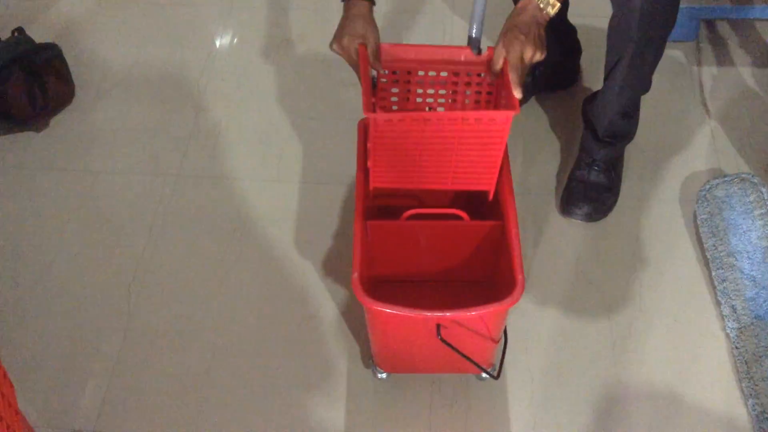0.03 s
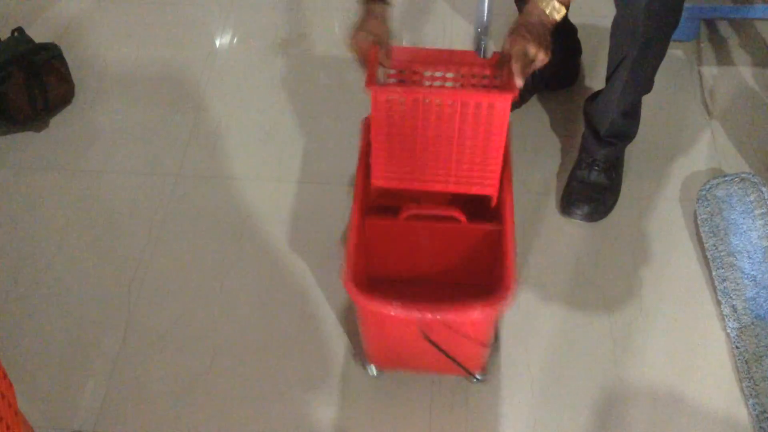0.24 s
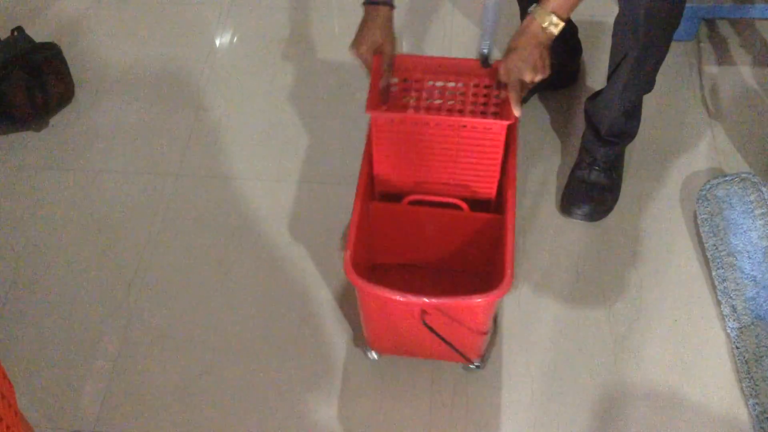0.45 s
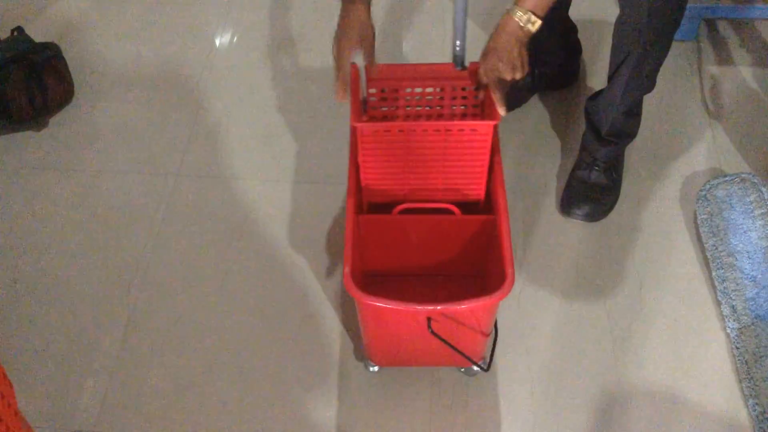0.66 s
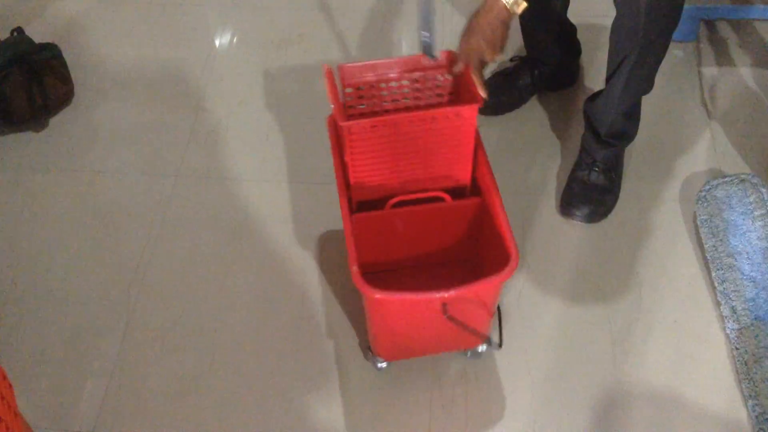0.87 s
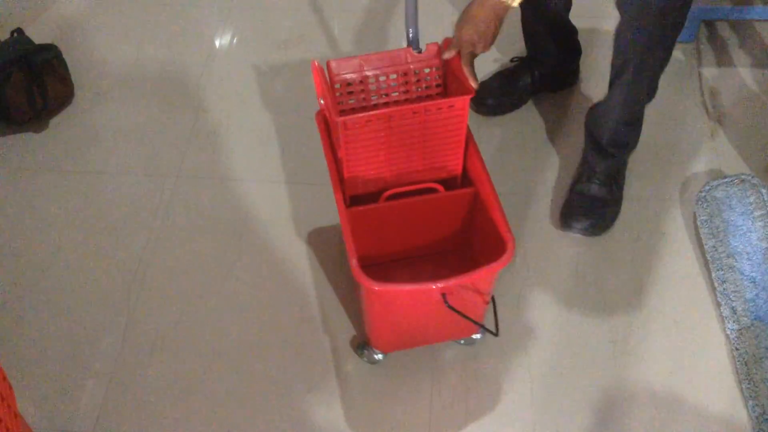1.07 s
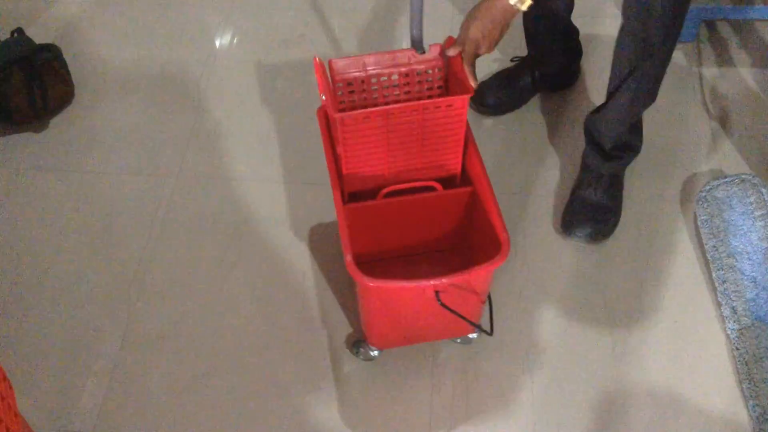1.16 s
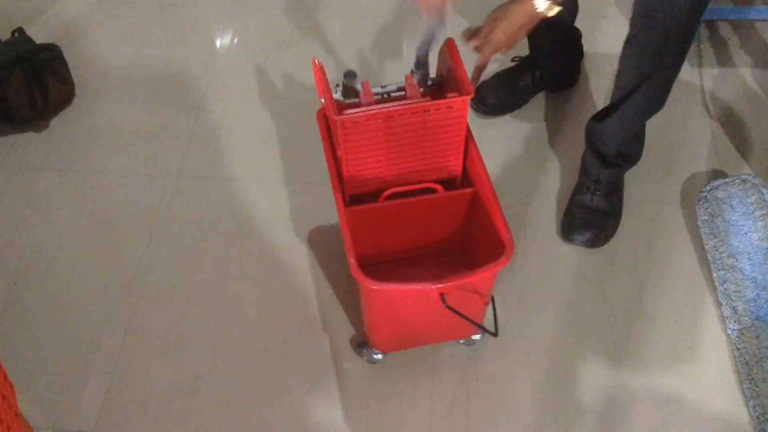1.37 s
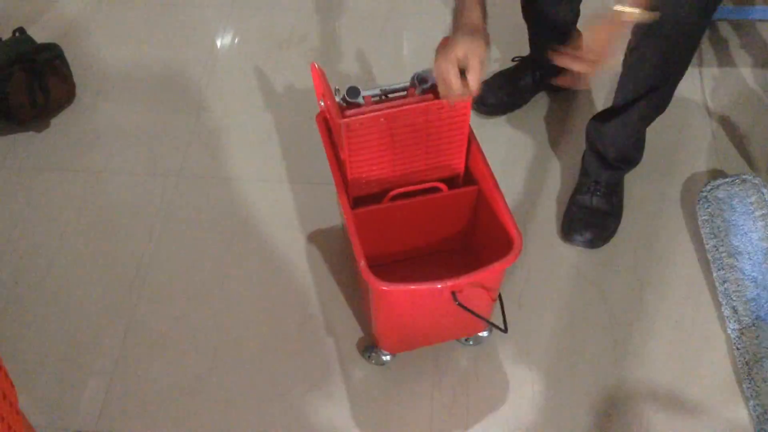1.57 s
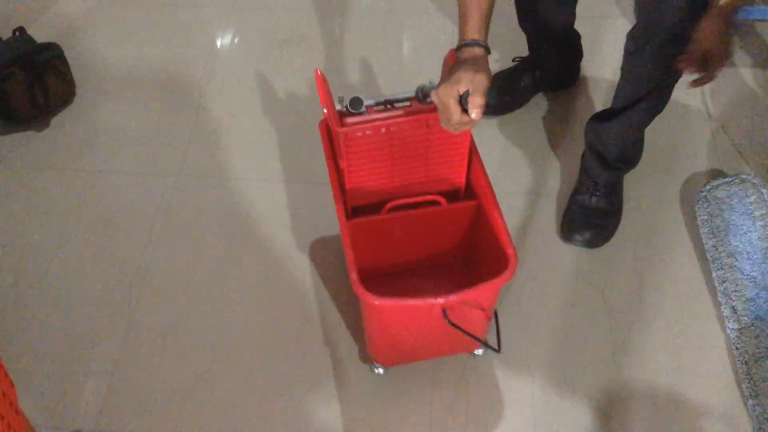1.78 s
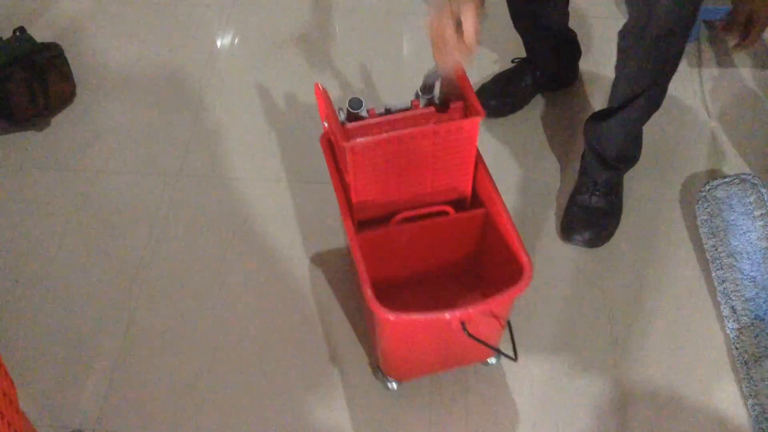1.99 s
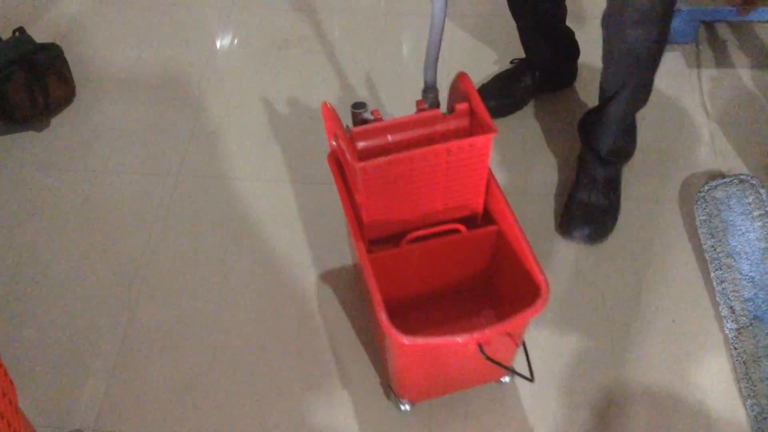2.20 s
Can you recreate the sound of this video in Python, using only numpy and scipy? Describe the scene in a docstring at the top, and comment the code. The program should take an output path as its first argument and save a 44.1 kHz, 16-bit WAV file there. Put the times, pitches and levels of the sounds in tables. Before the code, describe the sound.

A plastic wringer clatters onto a mop bucket, with loud, hollow knocks and sharp cracks from about 0.2 to 0.6 seconds. From 0.9 seconds the parts rub and rattle quietly as the metal lever swings over. It snaps over its catch near 1.5 seconds, firmer knocks follow around 1.7, and light ones come near 2 seconds. The sound is close, with a short tiled-room echo and faint air noise.

```python
"""A mop bucket in a tiled room, on one microphone close by, over faint air noise.
First a plastic wringer drops onto the bucket and clatters into its seat: each knock booms in the tub
and the wringer box, clacks in the thin walls and cracks at the hard edges. From about 0.9 s the parts
rub and rattle as the metal lever is swung over. Near 1.5 s it snaps over its catch; a few firmer
knocks follow, then some light last ones, and the room rings out."""
import sys
import numpy as np
from scipy import signal
from scipy.fft import rfft, irfft
from scipy.io import wavfile

SR = 44100
rng = np.random.default_rng(int(sys.argv[2]) if len(sys.argv) > 2 else 0)


def store_wav(level_fs):
    """Save 16-bit WAV to argv[1]."""
    pcm = np.round(np.clip(np.atleast_2d(level_fs), -1, 1) * 32767)
    wavfile.write(sys.argv[1], SR, pcm.T.astype(np.int16))


N = 99225
LONG_T, SHORT_T = np.arange(SR // 3) / SR, np.arange(SR // 10) / SR  # t/s within one sound


def undb(db):
    """Decibels to gain."""
    return 10 ** (np.asarray(db) / 20)


def unit(x):
    """Scale to rms 1."""
    return x / np.sqrt(np.mean(x ** 2))


def add(out, s, sound):
    """Mix a sound in at s seconds."""
    start = int(s * SR)
    out[start:start + len(sound)] += sound[:N - start]


def at(hz, points):
    """Read (f/Hz, value) points on a log-frequency axis."""
    freqs, values = np.array(points).T
    return np.interp(np.log(np.maximum(hz, 1)), np.log(freqs), values)


def colour(x, points):
    """Causal filter with the given spectrum; white noise keeps its power."""
    size = 4096
    gain = unit(undb(at(np.fft.rfftfreq(size, 1 / SR), points)))
    cepstrum = irfft(np.log(gain))[:size // 2]
    cepstrum[1:] *= 2  # minimum phase
    response = irfft(np.exp(rfft(cepstrum, size)))[:size // 2]
    return signal.fftconvolve(x, response)[:len(x)]


def clicks(count, per_s):
    """Impulses of random time and strength, over count samples."""
    return (rng.random(count) < per_s / SR) * rng.standard_normal(count)


def modes(hz, table, scatter_db=1):
    """Decaying sines; each blow lands elsewhere and weights them anew."""
    db, t60 = np.array(table).T[:, :, None]
    weight, phase = rng.standard_normal((2, len(table), 1))
    gain = undb(db + scatter_db * weight)
    gain = gain / np.sqrt(np.sum(gain ** 2) / 2)
    sines = np.sin(2 * np.pi * (np.outer(hz, LONG_T) + phase))
    return np.sum(gain * undb(-60 * LONG_T / t60) * sines, axis=0)


def burst(spectrum, contact_s, t60, rise_s=0.00024, touches_per_s=4000):
    """Many close, well-damped modes: they build while the parts chatter in contact, then die away."""
    build = 1 - np.exp(-SHORT_T / (rise_s + 0.21 * contact_s))
    envelope = build * undb(-60 * np.maximum(SHORT_T - contact_s, 0) / t60)
    touches = rng.random(len(SHORT_T)) < touches_per_s / SR
    drive = (1.3 + unit(touches * 1.)) * rng.standard_normal(len(SHORT_T))
    return unit(colour(envelope * drive, spectrum)) * np.sqrt(np.mean(envelope ** 2))


# Room tone at the microphone: f/Hz, relative level/dB
AIR_SPECTRUM = [(25, -30), (80, -11), (150, 4), (300, 2), (600, -7.5), (1500, -11), (3500, -6),
                (7500, -19.5), (15000, -18)]
def room_tone():
    """Still air and a faint, steady hiss."""
    return undb(-57) * unit(colour(rng.standard_normal(N), AIR_SPECTRUM))


# Ring time of the tiled room: f/Hz, T60/s
REVERB_T60 = [(150, 0.31), (400, 0.34), (1000, .5), (2800, .5), (4500, 0.3651), (7000, 0.25), (14000, 0.26)]
# Strength of its reverberation at the microphone: f/Hz, level/dB
REVERB_SPECTRUM = [(60, -9), (160, -9.5), (300, -9), (1000, -5.5), (3500, -6), (7000, -3.5), (14000, -2)]
def reverberation(x, build_s=0.002):
    """Dense reflections from the tiles and walls farther off; the treble dies first."""
    t, hz = np.arange(SR) / SR, np.fft.rfftfreq(SR, 1 / SR)
    noise, response = rfft(rng.standard_normal(SR)), 0
    centres = np.geomspace(60, 16000, 12)
    for centre, share in zip(centres, np.eye(len(centres))):
        envelope = (1 - np.exp(-t / build_s)) * undb(-60 * t / at(centre, REVERB_T60))
        band = irfft(noise * np.interp(hz, centres, share), SR)
        response += band * envelope / np.linalg.norm(envelope) * undb(at(centre, REVERB_SPECTRUM))
    return signal.fftconvolve(x, response)[:N]


def early_echoes(x, gap_s=0.002, t60=0.22):
    """A short spray of distinct echoes off the nearest tiles and the inside of the tub."""
    taps = clicks(len(LONG_T), per_s=900) * (LONG_T > gap_s) * undb(-60 * LONG_T / t60)
    taps = signal.sosfilt(signal.butter(2, 500, "high", fs=SR, output="sos"), taps)
    return undb(-8.5) * signal.fftconvolve(x, taps / np.linalg.norm(taps))[:N]


# Bumps down at the floor: t/s, level/dB
FLOOR_BUMPS = [(.342, -53), (.408, -40), (1.651, -51)]
def floor_thumps(hz=45, t60=0.12, rise_s=0.008):
    """Heavy blows rock the bucket on its castors: a low, quickly damped bump."""
    out = np.zeros(N)
    envelope = (1 - np.exp(-LONG_T / rise_s)) * undb(-60 * LONG_T / t60)
    for s, db in FLOOR_BUMPS:
        add(out, s, undb(db) * envelope * np.sin(2 * np.pi * hz * LONG_T))
    return out


# Rubbing where the parts meet: t/s, level/dB
RUB_LEVELS = [(0, -79), (.05, -54), (.11, -60), (.16, -51), (.21, -55), (.7, -57), (.88, -64.5),
              (.96, -45.5), (1.12, -61.5), (1.25, -59), (1.321, -59), (1.38, -51), (1.46, -56), (1.85, -57),
              (2.05, -53.5), (2.25, -56)]
# Its dull tone: f/Hz, relative level/dB
RUB_SPECTRUM = [(70, -40.5), (150, -0.5), (280, 5), (500, -11.5), (1000, -13), (2300, -18.5), (3600, -20),
                (7000, -30), (15000, -43)]
def rubbing():
    """Plastic sticks and slips on plastic in tiny uneven clicks."""
    slips = unit(colour(clicks(N, per_s=900), RUB_SPECTRUM))
    return slips * undb(np.interp(np.arange(N) / SR, *np.array(RUB_LEVELS).T))


# Short slips of the lever: t/s, length/s, level/dB
LEVER_SLIDES = [(1.03, 0.032, -55), (1.305, 0.0091, -58), (1.638, .018, -54), (2.23, 0.017, -56)]
# Their hiss, heard close: f/Hz, relative level/dB
SLIDE_SPECTRUM = [(1500, 1), (3500, 8.5), (6500, 3), (9000, -4), (13000, 3), (15500, -10)]
def lever_slides():
    """The lever slides along its guide with a bright hiss."""
    out = np.zeros(N)
    for s, length_s, db in LEVER_SLIDES:
        add(out, s, undb(db) * burst(SLIDE_SPECTRUM, length_s, t60=0.024))
    return out


# Ticks of the fittings as the wringer lands: t/s, level/dB
FITTING_PINGS = [(.2308, -26.5), (.353, -15), (.404, -30), (.521, -56)]
# Their bright tone: f/Hz, relative level/dB
PING_SPECTRUM = [(4000, -24), (8000, 0), (10500, 9), (13000, 3), (15500, -16)]
def fitting_pings():
    """Single hard contacts draw tiny bright ticks from the metal fittings."""
    out = np.zeros(N)
    for s, db in FITTING_PINGS:
        add(out, s, undb(db) * burst(PING_SPECTRUM, 0, t60=0.0038, rise_s=0.00008))
    return out


# Resonance of an edge facing the microphone: multiple of its pitch, relative level/dB
EDGE_PEAK = [(.5, -38.5), (.85, -10.5), (1.001, 0), (1.16, -10.5), (1.6, -38)]
def edge_ring(hz, contact_s, t60=0.024, rise_s=0.00024):
    """A tight cluster of modes of the struck edge rings briefly."""
    return burst(np.array(EDGE_PEAK) * [hz, 1], contact_s, t60, rise_s)


# Close-up spectra of the wall clack, edge crack and contact tick: f/Hz, relative level/dB
CLACK_SPECTRUM = [(120, -33.5), (300, -1), (490, -2.5), (720, 3), (1100, 3), (1600, -1.5), (2150, 1.5),
                  (2700, -14), (4500, -12), (9000, -87)]
CRACK_SPECTRUM = [(700, -14), (1800, -11), (2550, 0), (3300, 2), (4200, 0), (4900, -7), (6300, -13.5),
                  (7600, -28), (15000, -36.5)]
TICK_SPECTRUM = [(2500, -64), (5500, 13), (8000, -1.5), (10800, 4.5), (13000, 3), (15500, -2.5)]
def strike(clack_db, crack_db, tick_db, contact_s, crack_t60=0.038, tick_t60=0.024, rise_s=0.00024):
    """A blow sets off dense, short modes: thin walls clack, hard edges crack, with a tick on top."""
    clack = undb(clack_db) * burst(CLACK_SPECTRUM, contact_s, t60=0.073, rise_s=rise_s)
    crack = undb(crack_db) * burst(CRACK_SPECTRUM, contact_s, crack_t60, rise_s)
    tick = undb(tick_db) * burst(TICK_SPECTRUM, contact_s, tick_t60, rise_s)
    return clack + crack + tick


# The snap at the catch: tick level/dB, crack level/dB, clack level/dB, ring level/dB
SNAP_LEVELS = (-29.5, -23.5, -32, -16)
# Its click, heard through the lever's resonance: f/Hz, relative level/dB
LEVER_SPECTRUM = [(300, -25), (900, -4), (1400, -8), (2200, -7), (3400, -1), (4100, -3.5), (5000, -8),
                  (8000, -16.5), (15000, -25)]
def lever_snap(s=1.4822, rise_s=0.00008):
    """The lever snaps over its catch in one hard contact; rows: body, edge ring."""
    body, rings = np.zeros((2, N))
    tick_db, crack_db, clack_db, ring_db = SNAP_LEVELS
    add(body, s, strike(clack_db, crack_db, tick_db, 0, crack_t60=0.017, tick_t60=0.013, rise_s=rise_s))
    add(body, s, undb(-4.5) * colour(signal.unit_impulse(len(SHORT_T)), LEVER_SPECTRUM))
    add(rings, s, undb(ring_db) * edge_ring(hz=3650, contact_s=0, t60=0.01, rise_s=rise_s))
    return np.array([body, rings])


# Modes of the tub and of the wringer box on top of it: f/Hz
TUB_PITCHES = [150, 203, 221, 324, 390, 736]
BOX_PITCHES = [150, 272, 298, 342, 398, 599, 802, 1036, 1126]
# The same modes, in order: relative level/dB, T60/s
TUB_MODES = [(-5.5, 0.25), (2, 0.14), (-7, 0.36), (-3, 0.11), (-2.5, 0.15), (-3.5, 0.057)]
BOX_MODES = [(-21.5, 0.3), (2.5, .22), (-3.5, 0.54), (-13, 0.4), (-10.5, 0.17), (-13, .16), (-9.5, .14),
             (-20.5, 0.34), (-25, 0.11)]
def boom(tub_db, box_db, rise_s=0.0012):
    """The hollow tub and wringer box answer a blow with their low modes."""
    tub = undb(tub_db) * modes(TUB_PITCHES, TUB_MODES)
    box = undb(box_db) * modes(BOX_PITCHES, BOX_MODES)
    return (1 - np.exp(-LONG_T / rise_s)) * (tub + box)


# Knocks of the wringer, close to the microphone:
# t/s, level/dB of each of tub, box, clack, crack and tick, contact/s, ring f/Hz, ring level/dB
WRINGER_KNOCKS = [(0.221, -39, -15.5, -23.5, -34.5, -43, 0.01, 2010, -37.5),
                  (0.2439, -36, -19.5, -24.5, -24.5, -58, 0.0047, 2120, -23.5),
                  (0.2603, -32, -22, -19.5, -24, -37, 0.0038, 3370, -14.5),
                  (.284, -26.5, -23, -26, -24.5, -27.5, 0.001, 3180, -19),
                  (0.3364, -24, -18, -18.5, -16, -34.5, 0.0074, 5900, -28.5),
                  (0.3832, -15, -18.5, -20.5, -18, -39.5, 0.0057, 3460, -26),
                  (0.396, -12, -46, -20, -34, -30.5, 0.0066, 2080, -32),
                  (.414, -55, -40, -18.5, -24, -38, 0.00079, 3960, -22),
                  (0.4379, -55, -24, -19.5, -14.5, -29.5, 0.0034, 3770, -13),
                  (.462, -27, -43, -17.5, -27, -43, 0.0014, 4170, -42),
                  (0.475, -24.5, -26, -29.5, -43, -60, 0.0029, 2700, -23),
                  (0.494, -35, -32, -29.5, -53, -64, 0.0022, 1100, -52),
                  (0.52, -28, -27, -31, -41, -54, 0.0077, 1115, -28),
                  (0.576, -40, -38, -62, -58, -72, 0.002, 2560, -36.5),
                  (0.925, -49.5, -48, -47.5, -54.5, -68, .008, 2070, -53),
                  (0.942, -44.5, -41, -48.5, -61, -72, 0.011, 2120, -59),
                  (.995, -58, -54, -52, -54, -78, 0.01, 2030, -69),
                  (1.025, -57, -62, -40, -41.5, -62, 0.0083, 3290, -37.5),
                  (1.0883, -51, -55, -49, -57, -74, 0.0013, 4050, -47),
                  (1.1347, -51, -52, -52, -51.5, -72, 0.0056, 2130, -58),
                  (1.167, -66, -55, -51.5, -57, -72, 0.0027, 1110, -47),
                  (1.1978, -50, -61, -51, -52.5, -70, 0.0097, 3570, -55),
                  (1.222, -45, -46.5, -56, -52, -62, 0.011, 3400, -53),
                  (1.245, -50, -48, -56, -54, -76, 0.008, 3340, -58),
                  (1.3527, -60, -43.5, -42, -43.5, -71, 0.0048, 3370, -39.5),
                  (1.502, -43.5, -45.5, -66, -61, -64, 0.0036, 3800, -55),
                  (1.6128, -57, -50, -48.5, -42.5, -53, .001, 3150, -45),
                  (1.6502, -30, -36, -34.5, -28, -35, 0.0043, 3680, -35),
                  (1.663, -32.5, -33.5, -38.5, -60, -63, 0.0033, 3270, -56),
                  (1.6904, -41, -50, -40, -56, -62, 0.0042, 1330, -33.5),
                  (1.7064, -31, -34.5, -29.5, -37.5, -62, 0.0038, 1670, -32.5),
                  (1.924, -42, -47, -42.5, -41, -58, 0.0023, 3550, -47),
                  (1.965, -42.5, -56, -71, -66, -63, .003, 3440, -60),
                  (2.088, -38.5, -42.5, -42.5, -40.5, -53.5, 0.0035, 4200, -43.5),
                  (2.113, -35, -43, -69, -48.5, -55, 0.0026, 1950, -62)]
def wringer_knocks():
    """Every blow sounds tub, box, walls and edges in its own proportions; rows: body, edge ring."""
    body, rings = np.zeros((2, N))
    for s, tub_db, box_db, clack_db, crack_db, tick_db, contact_s, ring_hz, ring_db in WRINGER_KNOCKS:
        add(body, s, boom(tub_db, box_db))
        add(body, s, strike(clack_db, crack_db, tick_db, contact_s))
        add(rings, s, undb(ring_db) * edge_ring(ring_hz, contact_s))
    return np.array([body, rings])


def scene():
    """The bucket in its room, in mono; only the floor thumps reach into the deep bass."""
    body, rings = wringer_knocks() + lever_snap()
    rings += fitting_pings()
    body += rubbing() + lever_slides()
    into_room = body + undb(-7.5) * rings  # edges ring towards the microphone, less into the room
    heard = room_tone() + early_echoes(into_room) + reverberation(into_room) + body + rings
    low_cut = signal.butter(4, 135, "high", fs=SR, output="sos")
    return (signal.sosfilt(low_cut, heard) + floor_thumps())[None]


def record(dry):
    """The recorder cuts the treble above 15.4 kHz."""
    return signal.sosfilt(signal.ellip(10, .2, 80, 15400, fs=SR, output="sos"), dry)


dry = scene()
out = record(dry)
store_wav(out)
```